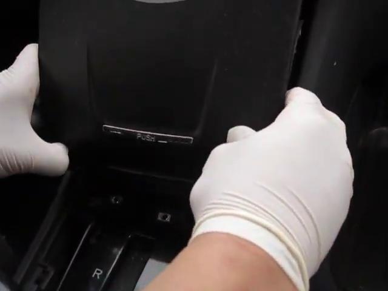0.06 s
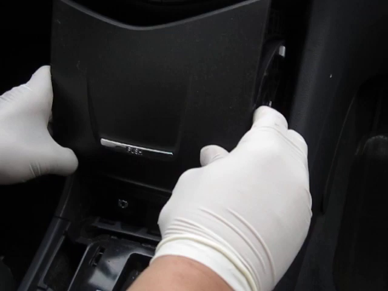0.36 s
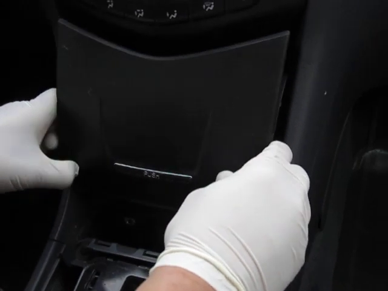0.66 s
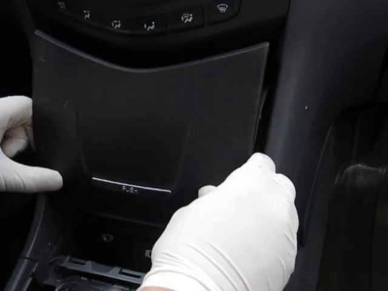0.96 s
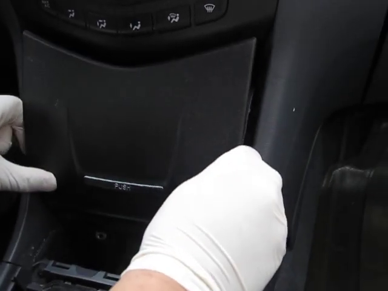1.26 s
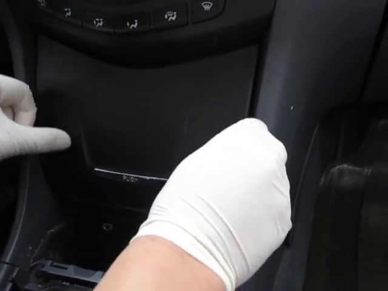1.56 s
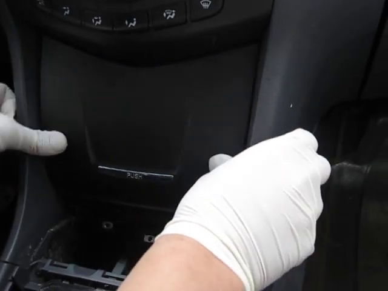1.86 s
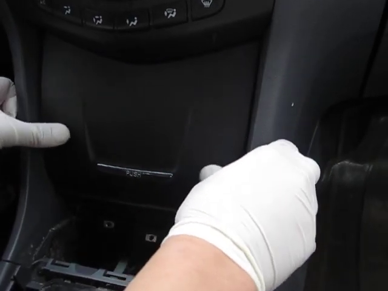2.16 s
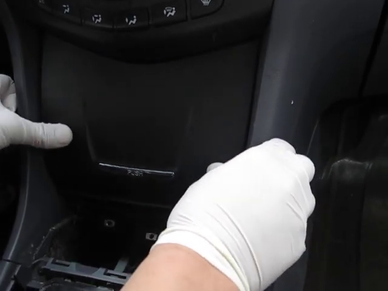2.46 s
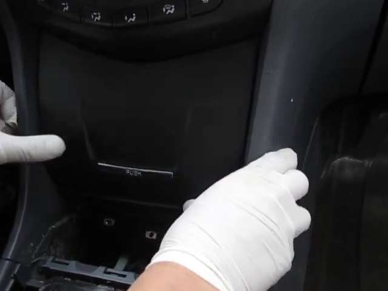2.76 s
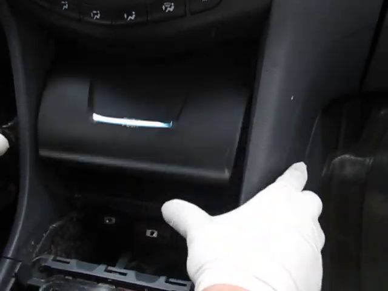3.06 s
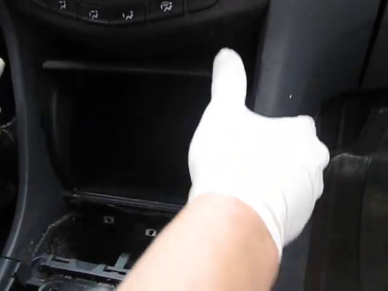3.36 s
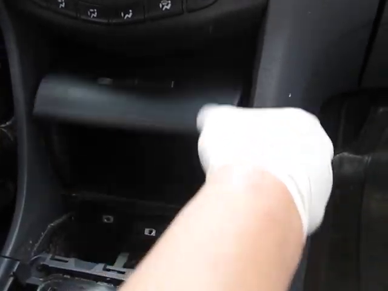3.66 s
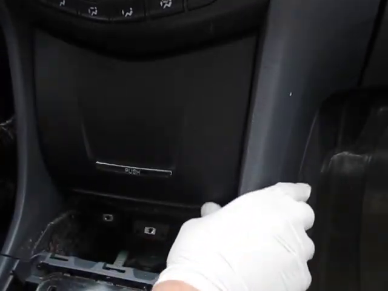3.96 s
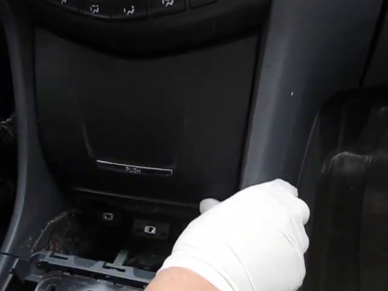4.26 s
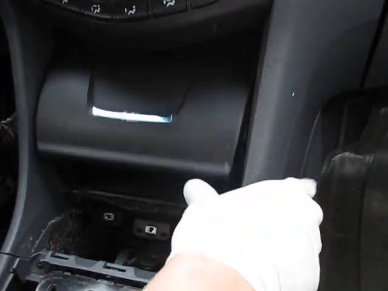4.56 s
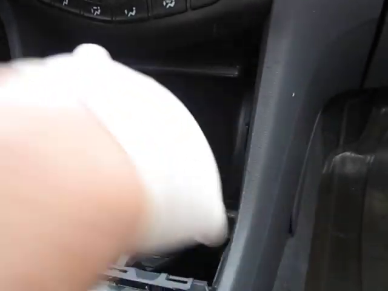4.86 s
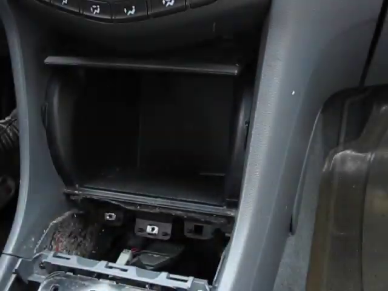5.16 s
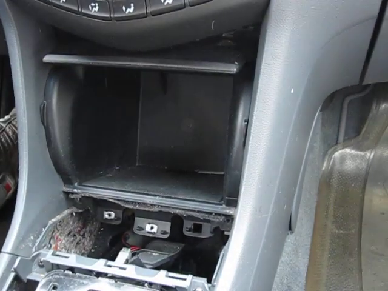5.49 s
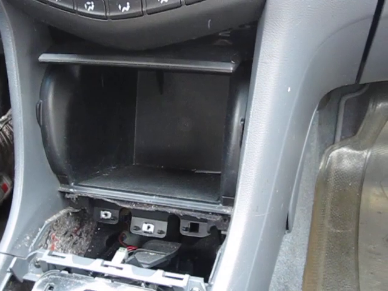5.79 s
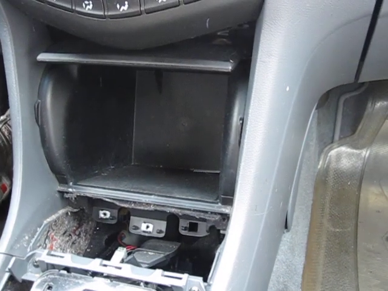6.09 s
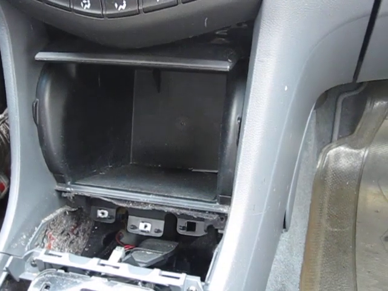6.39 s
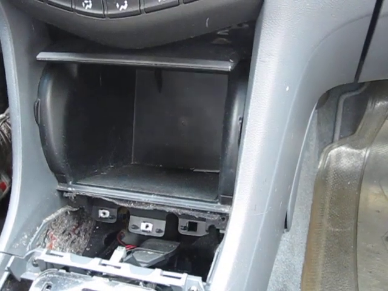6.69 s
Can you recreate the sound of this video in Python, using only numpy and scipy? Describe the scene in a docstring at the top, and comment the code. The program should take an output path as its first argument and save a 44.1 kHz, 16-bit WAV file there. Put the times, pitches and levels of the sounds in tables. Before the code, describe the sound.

Plastic trim scrapes, knocks and snaps into place, then a small lid clicks, whirrs and bumps, followed by light tool clinks.

```python
"""Plastic scrapes and knocks as rustling gloved hands press a storage bin into a parked car's centre
console, and its clips snap home. The push-latch lid is then tried: the latch ticks, the damper whirrs,
the lid bumps its stops. A dull creak follows, and hard tools are picked up over a faint rumble and hiss.
Each impact excites the damped modes of a part and the dense ring of console and cabin;
the scraping is stick-slip friction."""
import sys
import numpy as np
from scipy import signal
from scipy.io import wavfile

SR = 44100
rng = np.random.default_rng(int(sys.argv[2]) if len(sys.argv) > 2 else 0)


def transcribe(signal):
    """Save signal, clipped to [-1, 1], as a 16-bit WAV file at the path in sys.argv[1]."""
    frames = np.atleast_2d(signal).T
    limited = np.clip(frames, -1, 1)
    pcm = np.round(limited * 32767).astype(np.int16)
    wavfile.write(sys.argv[1], SR, pcm)


N = 296793

# boundaries between the body, middle, edge and snap registers (frequency [Hz])
REGISTER_EDGES = (600, 2400, 7000)
# reverberation of console and cabin (frequency [Hz], relative decay time [s])
RING_TIME = [(45, 1), (120, 0.26), (280, 0.19), (600, 0.14), (1400, 0.12), (3700, 0.11), (10000, 0.1)]

# broad spectra of the sources (frequency [Hz], relative spectral density [dB])
CABIN_SPECTRUM = [(12, -35), (20, -4.5), (58, 9.5), (90, 3.5), (168, -3), (270, -1), (399, -5), (718, -4),
                  (1090, -9), (1220, -8), (1570, -10.5), (2260, -12), (12400, -16.5), (16000, -26)]
RUSTLE_SPECTRUM = [(100,-9), (300,4.5), (600,1), (1500,3.5), (2500,1.5), (4500,-1), (8000,-2.5),
                   (13000,-1.5), (16000,-17)]
SCRAPE_SPECTRUM = [(35, -52), (60, 4), (200, -9.5), (340, -7), (450, -17), (600, 0), (1000, -2),
                   (1900, -5.5), (3200, -5.5), (4500, -9), (11500, -16.5), (16000, -34)]
TOOL_SPECTRUM = [(90, -45), (160, -22), (260, -11), (550, -16), (900, 2), (1800, -1), (2600, -8),
                 (6100, -15), (10500, -18), (13000, -9), (16000, -10)]
LID_SPECTRUM = [(21, -53), (35, -31), (90, 0.5), (190, -3.5), (309, 5.5), (430, -1.5), (798, 6.5),
                (1090, -5.5), (1230, -7.5), (1680, -7.5), (1910, -35), (2170, 6.5), (3440, -0.5),
                (4560, -9.5), (11200, -8.5), (16000, -44)]
LATCH_SPECTRUM = [(71, -40), (120, -17), (473, -20), (757, -7), (1030, -11.5), (1520, -0.5), (2110, -7),
                  (2380, 1), (3820, -13), (4230, -16), (4500, -17.5), (6630, -21.5), (13000, -29.5),
                  (16000, -40)]
TRIM_SPECTRUM = [(21, -47), (35, -8), (114, -21), (180, -6), (325, 3.5), (490, -13.5), (543, -10),
                 (1370, -2.5), (1810, -9), (2950, -1), (3810, -10), (7610, -21), (13000, -27.5),
                 (16000, -51)]

# normal modes of each part (frequency [Hz], bandwidth [Hz], relative level [dB])
CABIN_MODES = [(52, 5.9, -15), (110.4, 9.1, 0), (133.3, 5.1, -8)]
DAMPER_MODES = [(927, 220, 1.5), (1227, 28, 3), (1510, 20, -5), (2125, 35, -6)]
TOOL_MODES = [(982, 93, 0), (1244, 99, 0.5), (1420, 51, -4), (1720, 170, 0.5), (2306, 73, -1.5)]
LID_MODES = [(314, 23, 2.5), (402, 34, 0.5), (490, 23, -0.5), (524, 13, -12), (760, 82, 6.5), (933, 17, -1),
             (1230, 27, 3), (1300, 22, -5), (1820, 18, -8.5)]
LATCH_MODES = [(307.6, 17.5, -1), (738, 61, 2.5), (1510, 180, 9.5), (2520, 26, -3), (3120, 35, -34),
               (3560, 27, -1.5), (4490, 56, -3)]
CLIP_MODES = [(4940, 140, -6), (5320, 140, 2), (5660, 200, 5), (5975, 110, 3), (6440, 130, 2),
              (7500, 160, -4)]
BIN_MODES = [(920, 45, -16), (1140, 52, -9), (1325, 73, 7)]
TRIM_MODES = [(261.7, 14, 2), (324, 44, 5), (428, 13, -3.5), (470, 14, -6), (920, 135, -1), (1350, 270, -4),
              (1890, 35, -2), (2334, 58, -13), (2992, 59, -3)]

# sustained motions (start [s], end [s], level [dB])
RUSTLES = [(0.547,0.718,-50), (0.724,0.918,-55.5), (1.634,1.73,-50.5), (2.093,2.132,-51.5),
           (2.185,2.79,-57), (2.884,3.098,-52.5), (3.748,4.074,-51), (4.096,4.234,-46), (4.383,4.86,-51.5),
           (4.826,5.243,-52), (5.204,5.444,-62), (5.428,5.633,-47), (5.666,6.434,-51)]   # gloves and sleeves brushing past
SQUEAKS = [(.74,.94,-62), (4.91,5.14,-57)]   # glove rubber
LID_TRAVEL = [(2.94, 3.29, -44), (3.643, 3.93, -45), (4.43, 4.764, -45)]   # the lid turning its rotary damper
# plastic sliding on plastic (start [s], end [s], relative level [dB], body re level [dB])
SCRAPES = [(.005,0.048,-40,2.5), (0.126,0.248,-31,-1.5), (0.334,0.392,-28.5,-5), (.42,0.453,-21,-10),
           (0.464,0.513,-20.5,-10), (0.54,0.673,-44.5,0), (0.788,0.892,-48.5,-5.5), (0.934,0.971,-43,4),
           (0.99,1.078,-29,-4.5), (1.095,1.126,-37,-15), (1.311,1.4,-43,-6), (1.417,1.51,-39.5,-2),
           (1.51,1.628,-28,0.5), (1.67,1.702,-52,13), (1.816,1.86,-32.5,-2.5), (1.865,1.93,-36,0.5),
           (2.213,2.243,-40,-5.5), (2.363,2.401,-36.5,-5), (2.8,2.85,-29,-16), (3.251,3.282,-27,1),
           (3.541,3.665,-37.5,-2), (3.722,3.747,-33.5,-4), (3.857,3.93,-32,-4), (4.249,4.299,-30,-4.5),
           (4.726,4.773,-36.5,-4), (5.796,5.882,-38.5,-13), (5.921,5.951,-37.5,-25), (6.062,6.11,-36.5,-23),
           (6.227,6.267,-47,-12)]
# passband of the creak (lower edge [Hz], upper edge [Hz])
CREAK_BAND = (270, 900)
# heavy pushes that shake the console (time [s], force level [dB])
PUSHES = [(0.497, -29), (1.51, -31), (1.59, -28), (1.876, -25.5), (3.271, -25.5), (4.765, -25.5)]

# impacts (time [s], middle-register level [dB], body re level [dB], snap re level [dB])
TOOL_TAPS = [(5.4534,-31.5,-6,-21), (5.4885,-35,-8,2), (5.6665,-21.5,-9,-8), (5.7545,-33,-9,8.5),
             (5.8134,-42,-26,-5), (5.8545,-42,-18,-14), (5.863,-33,-21,-21), (5.8756,-33.5,-15,-18),
             (5.971,-48,-12,7.5), (6.1115,-28,-12.5,-20), (6.152,-50,-20,9.5), (6.2605,-33.5,-2.5,-14),
             (6.3325,-27,-7.5,-12), (6.3603,-21,-13,-19), (6.603,-44,1,9), (6.6269,-47.5,10,-24)]   # tool against tool
LID_BUMPS = [(2.8185,-20,-2.5,-22.5), (2.826,-41,2,3), (2.847,-41,-11,-2), (3.2705,-21.5,7,-18.5),
             (3.281,-26.5,-10,-57), (3.889,-35.5,10.5,-27), (3.8995,-20,-17,-11), (4.0712,-18.5,-9.5,-43),
             (4.083,-30,-2,-15), (4.263,-22,-7.5,-14), (4.7522,-24.5,-6,-12.5), (4.7655,-18,3,-19)]   # the lid meeting its stops
CLIP_SNAPS = [(1.5468, -31, 2.5, 6), (1.875, -17.5, -12.5, 1.5)]   # retaining clips springing home
BIN_KNOCK = [(0.3728, -13, -18, -22)]   # the hollow bin ringing as it strikes
TRIM_KNOCKS = [(0.1358,-21.5,-1.5,-23), (0.1564,-32.5,5,1), (0.1825,-12,-5.5,-9), (0.2568,-16,-1.5,-10),
               (0.3513,-25.5,10,-18), (0.3634,-34,-7,-5), (0.4153,-24,0.5,-13.5), (0.4827,-17.5,-13,-24),
               (0.4927,-24.5,-0.5,-7.5), (1.001,-38,-19,-18), (1.0305,-26.5,-17,-18), (1.0455,-20.5,-9,-6),
               (1.1054,-31.5,-14,-25), (1.3527,-31.5,-18,2), (1.395,-24,-19,-7.5), (1.491,-31,-10,-5),
               (1.505,-18,-18,-11.5), (1.5172,-31,-7,-4), (1.5882,-27,-16,-5.5)]   # the console struck by the bin
# ticks of the latch and lid gear (time [s], middle-register level [dB], snap re level [dB])
LATCH_TICKS = [(1.1915,-48.5,3), (1.7328,-25.5,-10.5), (2.0305,-23.5,-22.5), (2.2195,-32,-19),
               (2.3135,-30.5,-33), (2.3683,-34,-34), (2.473,-35,-0.5), (2.531,-39,-22), (2.5618,-39.5,-33),
               (2.6315,-25,-24), (2.669,-30,-19), (2.700,-32,-29), (2.7876,-28.5,-31), (2.8968,-24.5,-32),
               (3.052,-36.5,-10), (3.120,-28.5,-7), (3.192,-31,-10.5), (3.231,-52.5,11), (3.5725,-43,5.5),
               (3.605,-32,-13.5), (3.6845,-28.5,-6), (3.716,-26,-17), (4.006,-27,-25), (4.0278,-34,-24),
               (4.1045,-35,-20), (4.1318,-31.5,-38), (4.2265,-34,-35), (4.247,-51,4), (4.3603,-25.5,-24),
               (4.3856,-31,-34), (4.5907,-27.5,-14.5), (4.685,-29,-12), (4.811,-34,-16)]


def from_db(db):
    """Amplitude ratio of a level in decibels."""
    return 10 ** (np.asarray(db) / 20)


def rms_one(x):
    """Normalisation to unit rms."""
    return x / np.sqrt(np.mean(x ** 2) + 1e-20)


def unit_energy(x):
    """Normalisation of each row to unit energy."""
    return x / np.sqrt(np.sum(x ** 2, axis=-1, keepdims=True) + 1e-20)


def at_hz(points, hz):
    """Interpolation on a log-frequency axis."""
    frequencies, values = np.transpose(points)
    return np.interp(np.log(hz), np.log(frequencies), values)


def butter(x, hz, kind, order=2):
    """Causal Butterworth filtering."""
    return signal.sosfilt(signal.butter(order, hz, kind, fs=SR, output="sos"), x + 1e-18)


def bands():
    """Constant-Q bands about 0.4 octave wide, as (edges [Hz], centre [Hz])."""
    edges = np.geomspace(22, 17000, 25)
    return [((low, high), np.sqrt(low * high)) for low, high in zip(edges, edges[1:])]


def drift(rate):
    """Random modulation of unit rms, with `rate` new values a second."""
    knots = rng.standard_normal(int(rate * N / SR) + 2)
    return rms_one(np.interp(np.arange(N) * rate / SR, np.arange(len(knots)), knots))


def resonate(x, hz, width):
    """A damped oscillator whose ring has the same energy at any bandwidth."""
    r, w = np.exp(-np.pi * width / SR), 2 * np.pi * hz / SR
    numerator = np.sqrt(1 - r * r) * np.array([1, 0, -1]) / 2
    return signal.lfilter(numerator, [1, -2 * r * np.cos(w), r * r], x + 1e-18)


def modal_response(force, modes):
    """Superposition of modes driven by one force."""
    return sum(from_db(db) * resonate(force, hz, width) for hz, width, db in modes)


def coloured(pair, spectrum):
    """Spectral shaping to unit rms: two uncorrelated white sources feed alternate bands."""
    return rms_one(sum(from_db(at_hz(spectrum, hz)) * butter(pair[k % 2], edges, "band")
                       for k, (edges, hz) in enumerate(bands())))


def registers(x, edges):
    """Crossover filtering into adjoining registers, lowest first."""
    parts = []
    for hz in edges:
        parts.append(butter(x, hz, "low", order=3))
        x = butter(x, hz, "high", order=3)
    return parts + [x]


def pulses(times, db):
    """An impulse train with the given times and levels."""
    out = np.zeros(N)
    np.add.at(out, np.clip(np.asarray(times) * SR, 0, N - 1).astype(int), from_db(db))
    return out


def strokes(start, end, db, lag_s):
    """First-order relaxation: each stroke builds towards its level and dies with one time constant."""
    t = np.arange(N) / SR
    held = sum(from_db(d) * ((t >= a) & (t < b)) for a, b, d in zip(start, end, db))
    r = np.exp(-1 / (lag_s * SR))
    return signal.lfilter([1 - r], [1, -r], held + 1e-18)


def slips(per_s, spread_db, hiss):
    """Stick-slip friction: two force signals of tiny, uneven random clicks over a smooth hiss."""
    sizes = from_db(spread_db * np.minimum(rng.exponential(1, N), 4))
    slipping = rng.random(N) < per_s / SR
    clicks = rms_one(slipping * sizes * rng.choice([-1, 1], (2, N)))
    return clicks + hiss * rng.standard_normal((2, N))


def cabin_noise(level_db):
    """Stationary noise: a low rumble and faint hiss."""
    return from_db(level_db) * coloured(rng.standard_normal((2, N)), CABIN_SPECTRUM)


def gloves(lag_s, sway_db, squeak_hz, waver):
    """Friction of rubber gloves: an uneven hiss and an occasional thin, stuttering squeak."""
    hiss = coloured(rng.standard_normal((2, N)), RUSTLE_SPECTRUM) * from_db(sway_db * drift(rate=32))
    pitch = squeak_hz * (1 + waver * (drift(rate=20) + drift(rate=2000)))
    stutter = np.abs(drift(rate=70))
    squeak = rms_one(np.sin(2 * np.pi * np.cumsum(pitch) / SR) * stutter)
    return hiss * strokes(*np.transpose(RUSTLES), lag_s) + squeak * strokes(*np.transpose(SQUEAKS), lag_s)


def tool_slide(start_s, end_s, level_db, hz, width_hz):
    """Smooth friction between two taps of the tools: noise through one broad resonance."""
    progress = np.clip((np.arange(N) / SR - start_s) / (end_s - start_s), 0, 1)
    arch = np.sqrt(np.abs(np.sin(np.pi * progress)))
    return from_db(level_db) * arch * rms_one(resonate(rng.standard_normal(N), hz, width_hz))


def damper(fade_s, tone_hz, waver, tone_db, sway_db):
    """Forced vibration: the damper's gear whirrs and sings as the lid swings at an unsteady speed."""
    t = np.arange(N) / SR
    teeth = slips(per_s=900, spread_db=2.5, hiss=.3)[0]
    whirr = rms_one(modal_response(teeth, DAMPER_MODES))
    pitch = tone_hz * (1 + waver * drift(rate=17))
    tone = np.sin(2 * np.pi * np.cumsum(pitch) / SR) * drift(rate=74)
    travel = sum(from_db(db) * np.clip(np.minimum(t - start, end - t) / fade_s, 0, 1)
                 for start, end, db in LID_TRAVEL)
    return rms_one(whirr + from_db(tone_db) * tone) * travel * from_db(sway_db * drift(rate=33))


def creak(start_s, gap_s, slowing, force_db, step_db, count, t60_s):
    """Relaxation oscillation: uneven slips slow and weaken, each a dull burst of decaying noise."""
    k = np.arange(count)
    times = start_s + gap_s * (slowing ** k - 1) / (slowing - 1)
    force = pulses(times, force_db + step_db * k + 2 * rng.standard_normal(count))
    envelope = signal.lfilter([1], [1, -from_db(-60 / (t60_s * SR))], force + 1e-18)
    return butter(envelope * rng.standard_normal(N), CREAK_BAND, "band")


def cabin_boom():
    """Impulse response: each heavy push sets the lowest modes of the cabin swinging."""
    force = pulses(*np.transpose(PUSHES))
    return sum(from_db(db) * resonate(force, hz, width) / np.sqrt(2 * np.pi * width / SR)
               for hz, width, db in CABIN_MODES)


def scraping(judder_db, modes_db, treble_db, gain_db, graze_s, graze_db):
    """Stick-slip excitation: sliding edges shake the trim under a hand pressure that judders."""
    start, end, level, body = np.transpose(SCRAPES)

    def envelope(db, lag_s):
        """Friction extends past each stroke: the parts graze softly before and after it."""
        graze = strokes(start - graze_s, end + graze_s, db + graze_db, lag_s)
        return np.maximum(strokes(start, end, db, lag_s), graze)

    force = slips(per_s=1400, spread_db=3.3, hiss=.65)
    rings = rms_one(modal_response(force[0], TRIM_MODES))
    sound = coloured(force, SCRAPE_SPECTRUM) + from_db(modes_db) * rings
    pressure = from_db(gain_db + judder_db * drift(rate=110))
    low, middle, treble = map(rms_one, registers(sound, REGISTER_EDGES[:2]))
    panel = low * envelope(level + body, lag_s=.018)   # the panel's body follows more slowly
    surface = (middle + from_db(treble_db) * treble) * envelope(level, lag_s=.0053)
    return pressure * (panel + surface)


def latch_ticks(judder_s, gap_s, level_db, step_db, snap_db, count):
    """Contact chatter: the latch's impact table, with an even run of ever weaker ticks added."""
    chatter = [(judder_s + k * gap_s, level_db + k * step_db, snap_db) for k in range(count)]
    body_db = -13.5   # a light latch radiates little bass
    return [(time, db, body_db, snap) for time, db, snap in LATCH_TICKS + chatter]


def impacts(table, spectrum, modes, ring, crack_db, crack_s, modes_db, edge_db):
    """Free vibration after impact: a crack, the part's modes and the dense ring of console and cabin."""
    length_s, attack_s, rise_s = .2, .012, .00024
    times, level, body, snap = np.transpose(table)
    t = np.arange(int(length_s * SR)) / SR
    give = 1 - np.exp(-t / rise_s)   # compliance: the force takes a moment to build
    force = rng.standard_normal((len(times), 3, len(t))) * give
    crack = np.exp(-t / crack_s)
    dense = 0
    for k, (edges, hz) in enumerate(bands()):
        t60_s = ring * at_hz(RING_TIME, hz)
        fade = unit_energy(from_db(-60 * t / t60_s) + from_db(crack_db) * crack)
        dense = dense + from_db(at_hz(spectrum, hz)) * butter(force[:, k % 2] * fade, edges, "band")
    rings = modal_response(force[:, 2] * crack, modes)   # a noisy force strikes each mode differently
    sound = unit_energy(dense) + from_db(modes_db) * unit_energy(rings)
    # a heavy push brings out the body, a hard corner the edge and snap
    edge = edge_db + .19 * snap
    attack_levels = (level + body, level, level + edge, level + snap)
    hits = 0
    for part, db in zip(registers(sound, REGISTER_EDGES), attack_levels):
        attack_rms = np.std(part[:, :int(attack_s * SR)], axis=1)
        hits = hits + part * (from_db(db) / attack_rms)[:, None]
    out = np.zeros(N + len(t))
    for start, hit in zip((times * SR).astype(int), hits):
        out[start:start + len(t)] += hit
    return out[:N]


def scene():
    """Linear superposition of all sources at one nearby microphone."""
    ticks = latch_ticks(judder_s=2.058, gap_s=.0089, level_db=-30, step_db=-2, snap_db=-42, count=5)
    trim = impacts(TRIM_KNOCKS, TRIM_SPECTRUM, TRIM_MODES,
                   ring=.64, crack_db=-27, crack_s=.003, modes_db=-1.5, edge_db=-.5)
    hollow = impacts(BIN_KNOCK, TRIM_SPECTRUM, BIN_MODES,
                     ring=.7, crack_db=-3, crack_s=.002, modes_db=4.5, edge_db=-3.5)
    clips = impacts(CLIP_SNAPS, TRIM_SPECTRUM, CLIP_MODES,
                    ring=1, crack_db=9, crack_s=.003, modes_db=-4.5, edge_db=1.5)
    latch = impacts(ticks, LATCH_SPECTRUM, LATCH_MODES,
                    ring=.47, crack_db=-28, crack_s=.00031, modes_db=-3.5, edge_db=.47)
    lid = impacts(LID_BUMPS, LID_SPECTRUM, LID_MODES,
                  ring=.77, crack_db=-57, crack_s=.0019, modes_db=2, edge_db=-.95)
    tools = impacts(TOOL_TAPS, TOOL_SPECTRUM, TOOL_MODES,
                    ring=.58, crack_db=-16, crack_s=.004, modes_db=3.5, edge_db=-1.1)
    hits = trim + hollow + clips + latch + lid + tools + cabin_boom()
    scrapes = scraping(judder_db=3.5, modes_db=-1, treble_db=-9.5, gain_db=-1.52,
                       graze_s=.031, graze_db=-18)
    rustle = gloves(lag_s=.012, sway_db=3.47, squeak_hz=12600, waver=.018)
    slide = tool_slide(start_s=5.49, end_s=5.655, level_db=-44, hz=3030, width_hz=930)
    whirr = damper(fade_s=.035, tone_hz=1275, waver=.035, tone_db=-6, sway_db=2.5)
    creaking = creak(start_s=5.017, gap_s=.018, slowing=1.125, force_db=-23, step_db=-.4,
                     count=9, t60_s=.06)
    return (cabin_noise(level_db=-52) + rustle + slide + whirr + creaking + scrapes + hits)[None]


def record(dry):
    """Saturation and band limiting: the loudest snaps overload the microphone, and the top is cut."""
    ceiling, cutoff_hz = .72, 16000
    rounded = dry / (1 + (dry / ceiling) ** 4) ** (1 / 4)
    return signal.sosfilt(signal.ellip(10, .1, 90, cutoff_hz, fs=SR, output="sos"), rounded)


dry = scene()
out = record(dry)
transcribe(out)
```